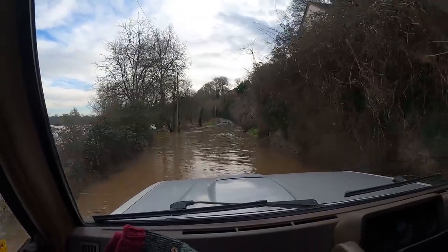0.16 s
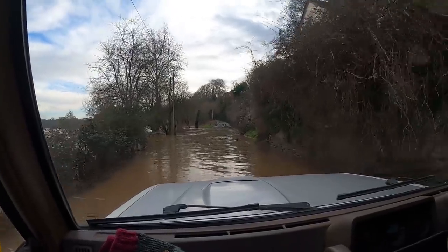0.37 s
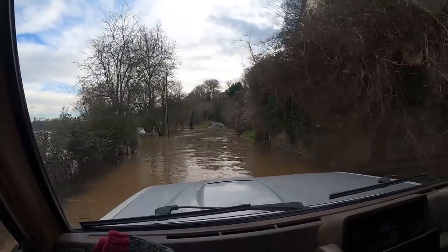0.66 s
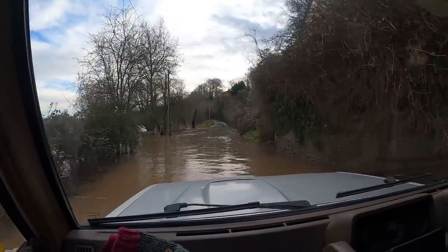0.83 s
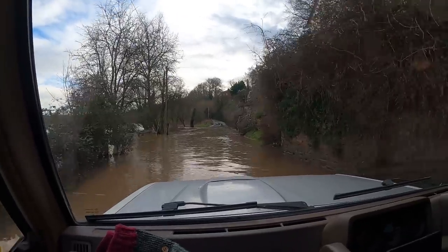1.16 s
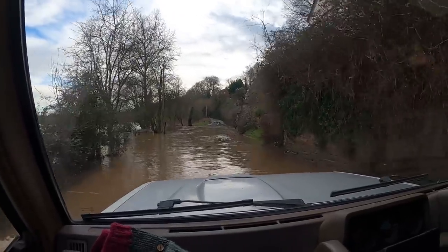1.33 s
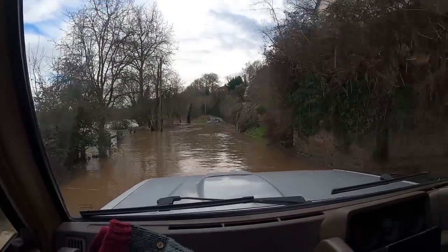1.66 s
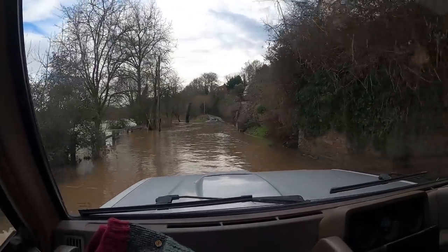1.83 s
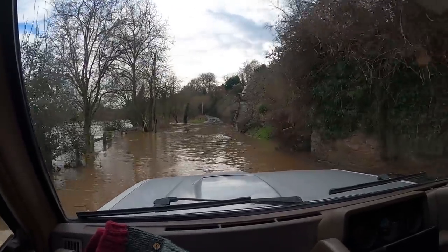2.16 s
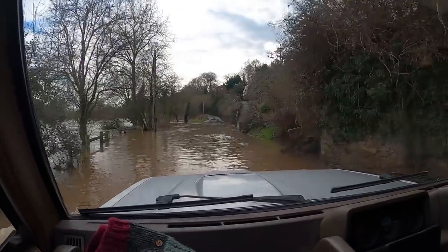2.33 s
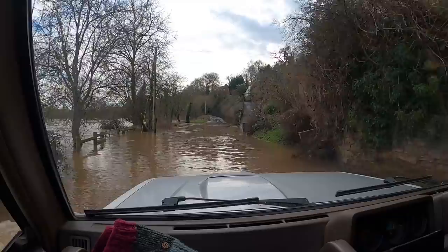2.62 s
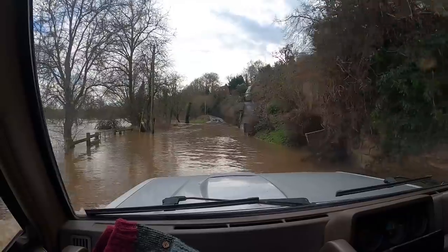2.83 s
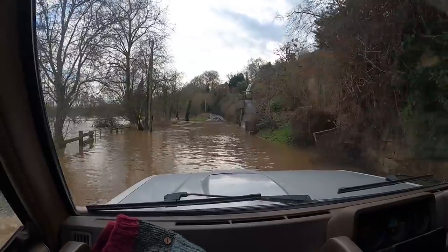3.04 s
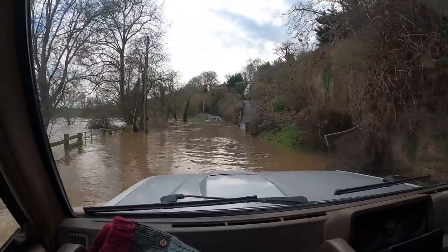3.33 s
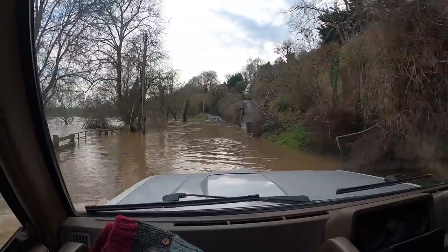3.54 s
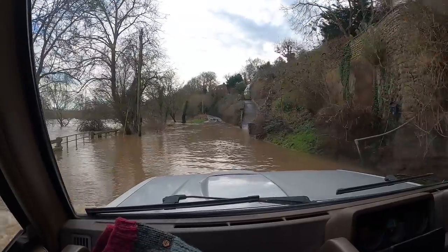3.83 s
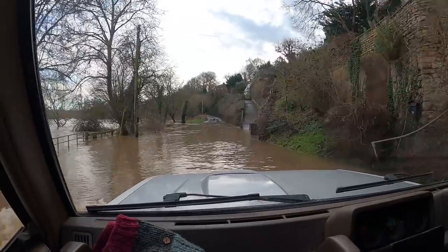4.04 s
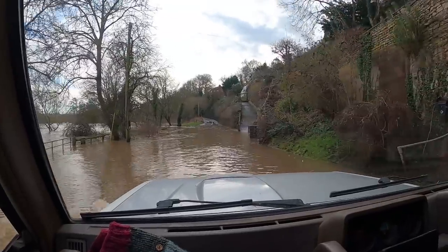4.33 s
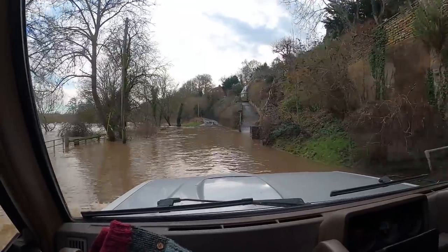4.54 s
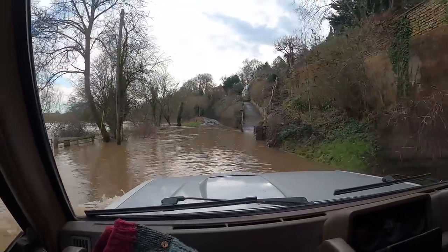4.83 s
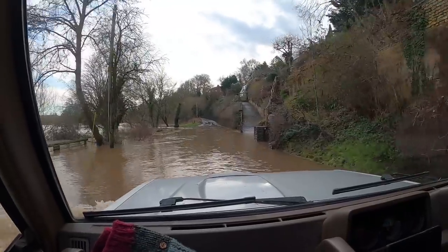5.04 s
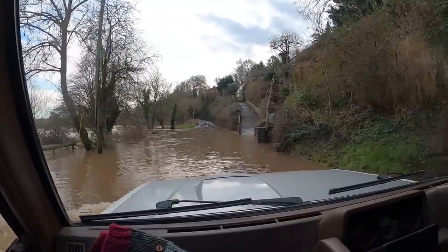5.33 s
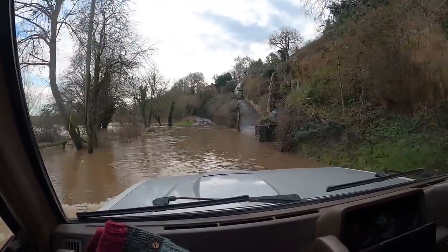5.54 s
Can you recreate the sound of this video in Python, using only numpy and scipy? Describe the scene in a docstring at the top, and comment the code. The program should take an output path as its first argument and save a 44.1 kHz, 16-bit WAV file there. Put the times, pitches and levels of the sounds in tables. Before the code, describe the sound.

Heard from inside the cab, a diesel engine hums very low and loud, throbbing at first, then rising slightly in pitch. Water shoves the body into dull booms, with a bent low groan midway. Softer continuous rushing and bubbling water lies outside, wide and a little to the left, swelling in brief surges.

```python
"""A four-cylinder diesel hums and speeds up, heard inside the cab of a vehicle wading along a flooded lane.
The engine is a stack of wavering sines on its firing rate; another sine, the gear tone, follows the road speed.
The cab booms as water shoves the body: beating sines, a bent held note and resonant noise over panel rumble.
Bow wave and wheel spray rush and bubble outside, window side on the left: coloured noise and short chirps.
"""
import sys
import numpy as np
from scipy import signal
from scipy.fft import rfft, irfft
from scipy.io import wavfile
from scipy.ndimage import uniform_filter1d, minimum_filter1d

SR = 44100
rng = np.random.default_rng(int(sys.argv[2]) if len(sys.argv) > 2 else 0)


def unload_wav(signal):
    """Save mono or channel-first audio to the path in sys.argv[1] as 16-bit WAV at rate SR, clipped to [-1, 1]."""
    wavfile.write(
        sys.argv[1],
        SR,
        np.round(np.clip(np.atleast_2d(signal).T, -1, 1) * 32767).astype(np.int16),
    )


N = 250488


def gain_of(db):
    """Decibels to amplitude."""
    return 10 ** (np.asarray(db) / 20)


def evened(x):
    """Scales to rms 1."""
    return x / np.sqrt(np.mean(x ** 2) + 1e-20)


def read_spectrum(points, hz):
    """Reads a table along a log-frequency axis."""
    f, value = np.transpose(points)
    return np.interp(np.log(hz + 1), np.log(f + 1), value)


def columns(rows, t):
    """Reads every column of a time curve at times t."""
    s, *rest = np.transpose(rows)
    return [np.interp(t, s, column) for column in rest]


def timeline():
    """The time of every sample, in seconds."""
    return np.arange(N) / SR


def shaped_noise(gain_at):
    """White noise filtered by a gain curve over frequency, at rms 1."""
    hz = np.fft.rfftfreq(N, 1 / SR)
    spectrum = rfft(rng.standard_normal(N)) * gain_at(hz)
    return evened(irfft(spectrum, N))


def drift(t, top_hz):
    """Slow random motion of rms 1: sines of random phase, stronger when slower."""
    rates = top_hz * np.geomspace(1 / 20, 1, num=24)[:, None]
    coarse = t[::max(len(t) // 2000, 1)]
    waves = np.sin(2 * np.pi * (rates * coarse + rng.random((24, 1)))) / np.sqrt(rates)
    return np.interp(t, coarse, evened(waves.sum(0)))


def tone(hz, db, waver_db, wander, waver_hz):
    """A sine on a pitch curve; level (dB) and phase (radians) waver at rates up to waver_hz."""
    t = timeline()
    turns = np.cumsum(hz) / SR + rng.random()
    angle = 2 * np.pi * turns + wander * drift(t, waver_hz)
    level = gain_of(db + waver_db * drift(t, waver_hz))
    return np.sqrt(2) * level * np.sin(angle)


# Spectral shape of the body-panel rumble: f/Hz, relative level/dB per Hz
PANEL_SPECTRUM = [(12, -15), (20, -7), (25, -7), (30, -10), (35, -4.5), (42, 0.5), (52, 1.5), (72, 3),
                  (97, -1.5), (130, -4.5), (150, -6), (205, -3.5), (260, -14.5), (290, -13), (400, -33.5),
                  (600, -69)]
# Rumble fader, ahead of the bass trim: t/s, level/dB
PANEL_LEVEL = [(0, -24), (1, -26), (2, -23), (3, -23), (4, -21.5), (5, -25), (5.68, -23)]


def rumble():
    """Structure-borne low noise from the body panels."""
    noise = shaped_noise(lambda hz: gain_of(read_spectrum(PANEL_SPECTRUM, hz)))
    return noise * gain_of(columns(PANEL_LEVEL, timeline())[0])


def bubbles(per_s, spread_db):
    """Air pockets burst in the churned water as short rising tones, mostly near full strength."""
    out = np.zeros(N)
    pitches = np.geomspace(500, 9000, num=30)
    for hz, cycles in zip(pitches, rng.uniform(4.7, 10.95, size=30)):
        u = np.arange(int(3 * cycles * SR / hz)) * hz / SR / cycles
        grain = u * np.exp(-3 * u) * np.sin(2 * np.pi * cycles * u * (1 + 0.097 * u))
        grain = grain / np.linalg.norm(grain) * np.sqrt(hz / 2000)
        strengths = gain_of(spread_db * np.minimum(rng.exponential(1, N), 5))
        bursts = strengths * (rng.random(N) < per_s / 30 / SR)
        out += signal.oaconvolve(bursts, grain)[:N]
    return evened(out)


# Rush fader and brightness: t/s, level/dB, tilt/dB per octave above 1 kHz
RUSH_CURVE = [(0, -33, 0.4), (.35, -31.5, 0), (1.0, -32, 0.33), (1.75, -32, 0.14), (2.3, -30.5, 0.07),
              (3.3, -30.5, -0.33), (3.75, -30.5, -0.2), (4.1, -32, 0.15), (4.8, -32.5, -0.4),
              (5.2, -31, -0.25), (5.68, -33, 0)]
# Brief bow-wave surges: t/s, peak rise/dB, tilt change/dB per octave
BOW_SURGES = [(.53, 1.1, 0.3), (1.13, 1.2, -0.6), (1.45, 0.5, -0.1), (1.959, 1.1, -.5), (2.53, 0.7, 0),
              (2.73, 1.3, -0.9), (3.23, 0.5, -.6), (3.63, .8, .5), (4.18, 0.8, .2)]
SURGE_S = .045  # standard deviation of each bell-shaped surge


def wading(t):
    """Level and brightness of the rush, swelling briefly with each bow-wave surge."""
    s, rise_db, brighter = np.transpose(BOW_SURGES)
    bumps = np.exp(-.5 * ((t[:, None] - s) / SURGE_S) ** 2)
    level_db, tilt = columns(RUSH_CURVE, t)
    return level_db + bumps @ rise_db, tilt + bumps @ brighter


def patchy(shape, bins, frames):
    """Random texture of rms 1, smoothed over frequency bins and time frames."""
    across_frequency = uniform_filter1d(rng.standard_normal(shape), bins, 0)
    return evened(uniform_filter1d(across_frequency, frames, 1))


# Base colour of water through glass and door: f/Hz, relative level/dB per Hz
RUSH_SPECTRUM = [(180, -29), (300, 1.5), (420, -6.5), (570, -16), (690, -5), (810, -13), (1020, -3),
                 (1150, -10), (1540, -10.5), (2920, -15), (6670, -24.5), (7610, -24.5), (9270, -33),
                 (12300, -40), (14000, -48), (15600, -58)]
# Cab resonances on the rush: f/Hz, width/Hz, boost/dB (negative cuts)
CAB_RESONANCES = [(518, 57, 6), (650, 60, 2.5), (987.5, 59, 6), (1050, 76, -6), (8000, 500, 1)]
# Two microphone ports in a mostly diffuse field: f/Hz, likeness (-1 to 1)
PORT_LIKENESS = [(200, .99), (500, .86), (900, .75), (1200, .58), (2000, .72), (2600, .53), (3500, .36),
                 (4250, .02), (6300, -.4), (9000, -.27), (12000, -.12), (15000, .1)]
# Phase between the ports: f/Hz, right lead/radians
RIGHT_LEAD = [(400, 0.01), (1100, .25), (2000, .75), (3900, 1.3), (5400, 1.1), (6800, .3), (8300, 1.3),
              (9200, -.15), (12000, .1), (15000, 0)]
# Tonal balance between the ports: f/Hz, left-minus-right level/dB
PORT_BALANCE = [(200, .3), (400, .4), (700, 3), (1290, 3.2), (2380, 4.2), (4400, 3.5), (7800, 2.6),
                (8800, .3), (15000, .4)]


def water():
    """Hiss and bubbles, coloured by the cab, patchy and slapping, spread over the two ports."""
    share = .15  # bubbles' share of the power
    raw = []
    for _ in "LR":
        hiss = rng.standard_normal(N)
        raw.append(np.sqrt(1 - share) * hiss + np.sqrt(share) * bubbles(per_s=2500, spread_db=-1.5))
    hz, t, (a, b) = signal.stft(raw, SR, nperseg=512, noverlap=384)
    level_db, tilt = wading(t)

    patches = patchy(a.shape, bins=8, frames=12)
    # waves slapping the doors flicker across wide bands; the treble varies most
    slaps = patchy(a.shape, bins=90, frames=6)
    octaves = np.log2(np.maximum(hz, 1000) / 1000)[:, None]
    modes_db = sum(db / (1 + (2 * (hz - f) / width) ** 2) for f, width, db in CAB_RESONANCES)
    colour_db = (read_spectrum(RUSH_SPECTRUM, hz) + modes_db)[:, None] + tilt * octaves
    colour_db = colour_db + 0.34 * patches + (-0.87 + 0.45 * octaves) * slaps

    # the right port blends in a second, independent rush where likeness is low
    same = np.clip(read_spectrum(PORT_LIKENESS, hz), -1, 1)[:, None]
    lead = np.exp(1j * read_spectrum(RIGHT_LEAD, hz))[:, None]
    right = (same * a + np.sqrt(1 - same ** 2) * b) * lead
    lean = gain_of(read_spectrum(PORT_BALANCE, hz) / 2)[:, None]
    spectra = np.array([a * lean, right / lean]) * gain_of(colour_db)
    both = signal.istft(spectra, SR, nperseg=512, noverlap=384)[1][:, :N]
    mono_rms = np.sqrt(np.mean(both.mean(0) ** 2))
    return both / mono_rms * gain_of(np.interp(timeline(), t, level_db))


# Random boom fader, ahead of the bass trim: t/s, level/dB
SHOVE_LEVEL = [(0, -12), (.5, -24), (.7, -41), (1.75, -42), (1.95, -19.5), (2.3, -12.5), (2.5, -24),
               (3.5, -31), (3.7, -21.5), (4.3, -16.5), (4.6, -25), (4.95, -20.5), (5.68, -29)]
BOOM_HZ, BOOM_WIDTH_HZ = 45.7, 20


def boom():
    """Random shoves of water ring the low cab resonance: noise through a narrow peak."""
    noise = shaped_noise(lambda hz: 1 / (1 + (2 * (hz - BOOM_HZ) / BOOM_WIDTH_HZ) ** 4))
    return noise * gain_of(columns(SHOVE_LEVEL, timeline())[0])


# Held boom while the firing note sags, ahead of the bass trim: t/s, f/Hz, level/dB
HELD_BOOM = [(2.3, 45.1, -32), (2.45, 45.5, -11), (2.6, 46.5, -17.5), (2.85, 45.24, -14), (3.05, 48, -15),
             (3.3, 51.5, -17), (3.55, 54, -20)]


def groan():
    """The cab boom holds one low note, then bends upward."""
    t = timeline()
    gate = 1. * (t > HELD_BOOM[0][0]) * (t < HELD_BOOM[-1][0])
    soft_gate = uniform_filter1d(gate, size=2000)
    return soft_gate * tone(*columns(HELD_BOOM, t), waver_db=0.0, wander=0.37, waver_hz=6.1)


# Transmission tone, ahead of the bass trim: t/s, f/Hz, level/dB
GEAR_TONE = [(0.0, 232.8, -41.5), (1.05, 237, -37), (2.1, 238.6, -38.5), (2.45, 239.7, -35),
             (3.15, 247.4, -37), (3.85, 258, -43), (4.55, 259, -36), (4.9, 256.3, -30), (5.25, 248.6, -33),
             (5.68, 222.1, -25.5)]


def gear():
    """A transmission tone that rises with road speed and drops as the vehicle slows."""
    return tone(*columns(GEAR_TONE, timeline()), waver_db=1.0, wander=0.65, waver_hz=12)


# Clear throbs, the boom swinging in step with the firing note; ahead of the bass trim: t/s, boom level/dB
CLEAR_THROBS = [(0.524, -20.5), (0.713, -21.3), (0.814, -21.4), (0.947, -17.5), (1.081, -18.2),
                (1.166, -20.0), (1.274, -19.7), (1.392, -16.0), (1.565, -19.3), (1.769, -16.8)]
# Engine note, ahead of the bass trim: t/s, firing rate f/Hz, level/dB of firing orders 1, 2, 3, 4
# (order 1 sounds in throb, orders 2 to 4 in engine)
FIRING = [(0.0, 54.75, -15.6, -33.4, -33.3, -37.4), (0.3, 54.6, -12.7, -35.5, -34.2, -40.8),
          (0.9, 54.81, -15.2, -28, -31, -37.5), (1.3, 55.25, -13.8, -30.5, -34, -38),
          (1.8, 55.66, -15.8, -33.3, -44, -43), (2.1, 55.74, -16.8, -31.5, -31.8, -44.4),
          (2.55, 56.46, -23.5, -29.4, -37, -38.9), (2.85, 57.23, -25, -22.1, -32, -36.3),
          (3.05, 57.8, -28, -22.4, -28.7, -34.5), (3.3, 58.7, -22.0, -23.5, -27, -39.0),
          (3.4, 59.1, -20.5, -18.5, -23.5, -46), (3.55, 59.6, -19.4, -16.1, -24.9, -50),
          (3.85, 60.23, -18, -18.6, -24.5, -41.3), (4.1, 60.62, -14.8, -21, -29.5, -42),
          (4.2, 60.8, -14.4, -22.4, -24.5, -40), (4.35, 61.36, -13.7, -24.5, -23.7, -41.6),
          (4.6, 62.15, -14.8, -17.7, -26, -43.7), (5.0, 62.67, -16.1, -17.5, -21.6, -36),
          (5.4, 62.97, -14.8, -19.5, -23.0, -37.7), (5.68, 63.02, -14.2, -17.5, -21.6, -31.5)]
THROB_FADE_S = 0.02  # time constant of the bell-shaped fade at either end


def throb():
    """The firing note beats with a lower cab boom that falls one turn behind it per throb."""
    t = timeline()
    hz, firing_db = columns(FIRING, t)[:2]
    turns = np.cumsum(hz) / SR
    s, boom_db = np.transpose(CLEAR_THROBS)
    turns_behind = np.interp(t, s, np.arange(len(s)))
    outside_s = np.maximum(np.maximum(s[0] - t, t - s[-1]), 0)
    fade = np.exp(-(outside_s / THROB_FADE_S) ** 2)
    firing_note = gain_of(firing_db) * np.sin(2 * np.pi * turns)
    boom_note = fade * gain_of(np.interp(t, s, boom_db)) * np.sin(2 * np.pi * (turns - turns_behind))
    return np.sqrt(2) * (firing_note + boom_note)


# Weak side orders, ahead of the bass trim: multiple of firing rate, level/dB
WEAK_ORDERS = [(2.5, -43.5), (3.5, -43), (5, -48.5), (6, -54), (9, -51.5), (10, -58)]


def engine():
    """Upper firing orders, rough from uneven firings; unlike cylinders add weak half orders."""
    hz, _, *levels = columns(FIRING, timeline())
    upper = sum(tone(order * hz, db, waver_db=2.1, wander=.2, waver_hz=12)
                for order, db in enumerate(levels, start=2))
    side = sum(tone(order * hz, db, waver_db=2.5, wander=.4, waver_hz=15) for order, db in WEAK_ORDERS)
    return upper + side


BASS_TRIM_DB, LEFT_TRIM_DB = 0.75, .15
PORT_RUMBLE_DB = -19  # a little rumble differs between the ports


def scene():
    """The bass reaches both ports nearly alike, the left a touch late; the water is wide."""
    low = (engine() + throb() + groan() + boom() + gear() + rumble()) * gain_of(BASS_TRIM_DB)
    late = np.concatenate([low[:3], low[:-3]])  # three samples
    unshared = gain_of(PORT_RUMBLE_DB) * rumble()
    bass_pair = np.array([late * gain_of(LEFT_TRIM_DB) + unshared, low - unshared])
    return bass_pair + water()


BASS_EDGE_HZ, BASS_KNEE_DB, BASS_HOLD_S = 344, -7.5, 0.028
BASS_SQUEEZE = 0.53  # share of the overshoot (dB) taken away
EDGE_HZ = 15650  # top of the passed band


def record(dry):
    """The recorder holds down loud bass by its smoothed peaks, then rolls off the extreme treble."""
    low_pass = signal.butter(4, BASS_EDGE_HZ, fs=SR, output="sos")
    bass = signal.sosfiltfilt(low_pass, dry)
    hold = round(BASS_HOLD_S * SR)
    peak = -minimum_filter1d(-abs(bass.mean(0)), hold)
    peak_db = 20 * np.log10(peak + 1e-6)
    over_db = np.maximum(peak_db - BASS_KNEE_DB, 0)
    cut_db = BASS_SQUEEZE * uniform_filter1d(over_db, hold)
    held = dry - bass * (1 - gain_of(-cut_db))
    padded = np.pad(held, ((0, 0), (255, 255)), "reflect", reflect_type="odd")
    band_limit = signal.firwin(511, EDGE_HZ, window=("kaiser", 9), fs=SR)
    return signal.oaconvolve(padded, band_limit[None], "valid")


dry = scene()
out = record(dry)
unload_wav(out)
```